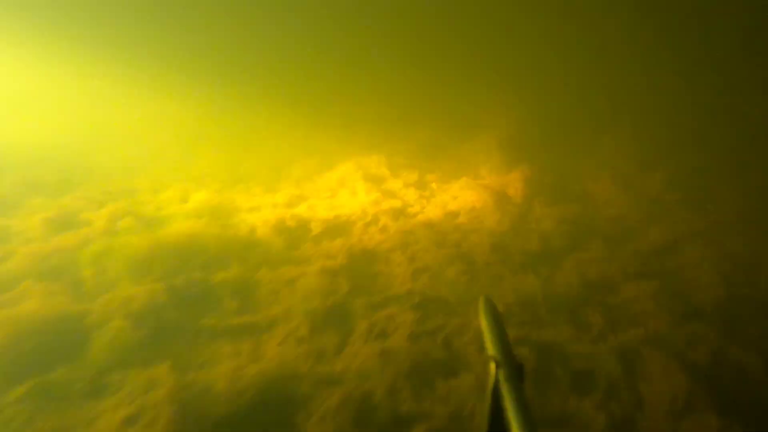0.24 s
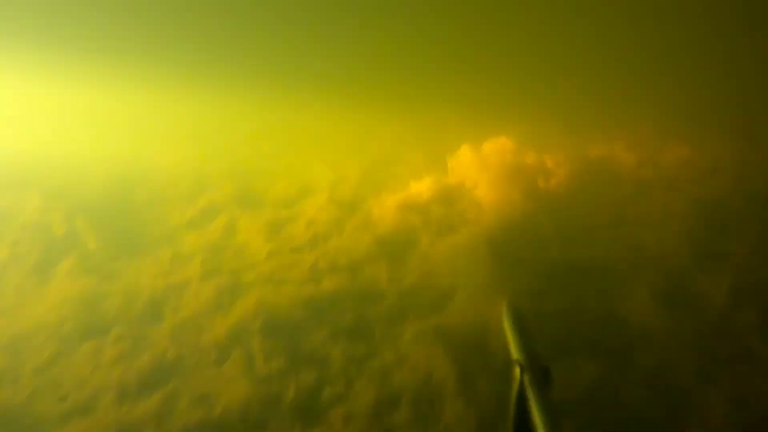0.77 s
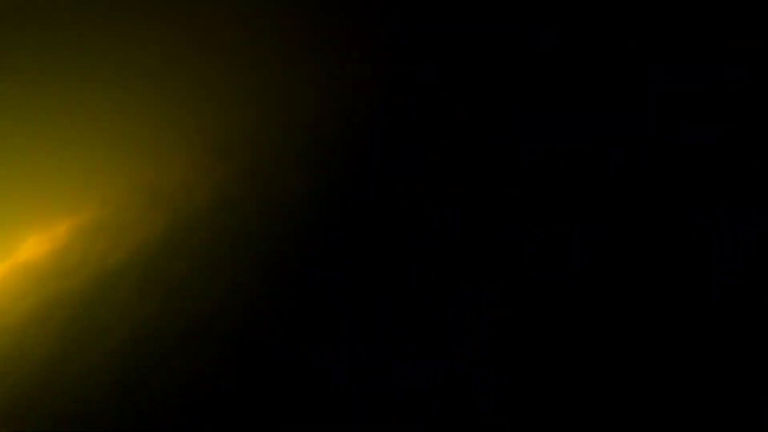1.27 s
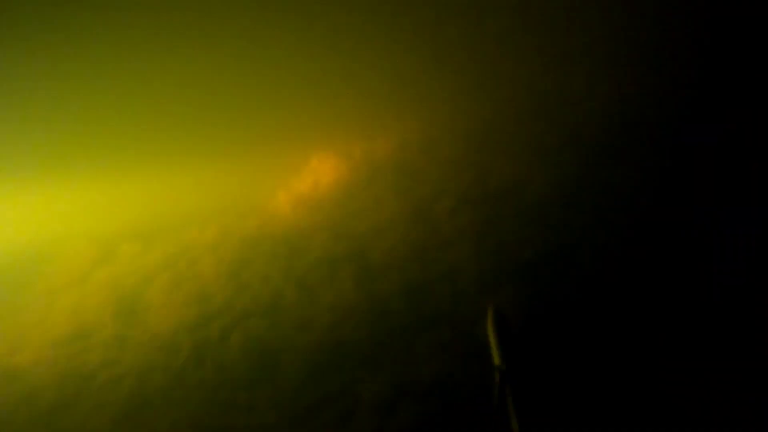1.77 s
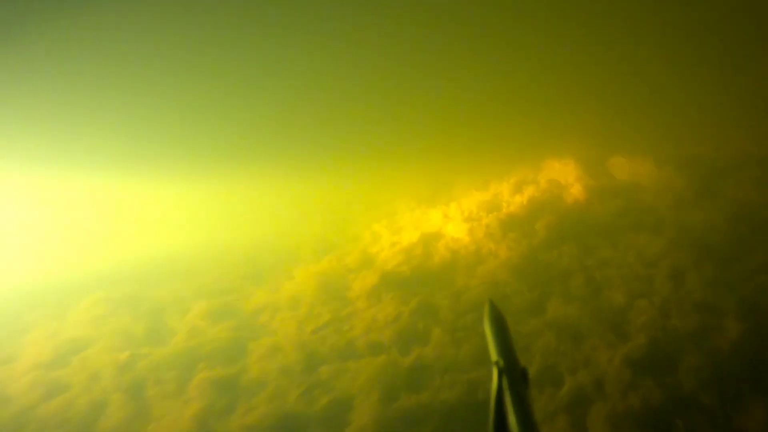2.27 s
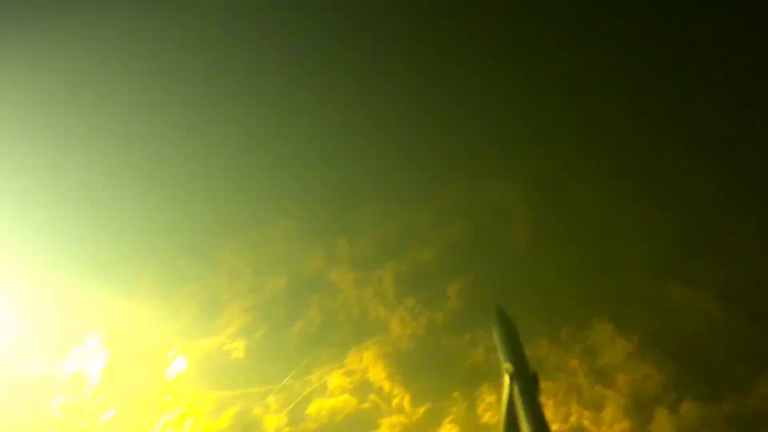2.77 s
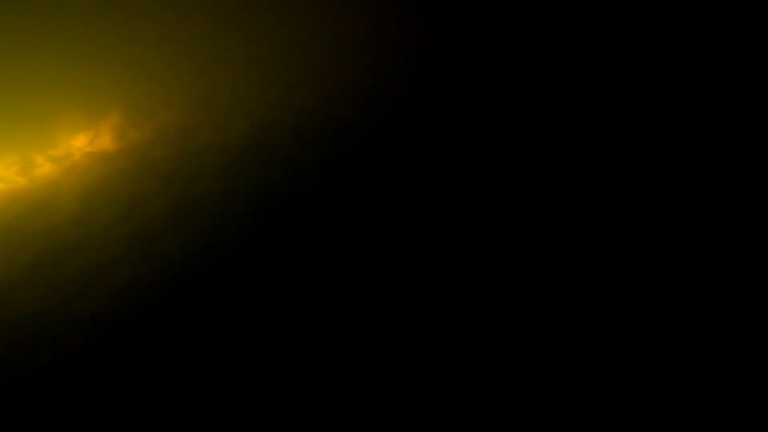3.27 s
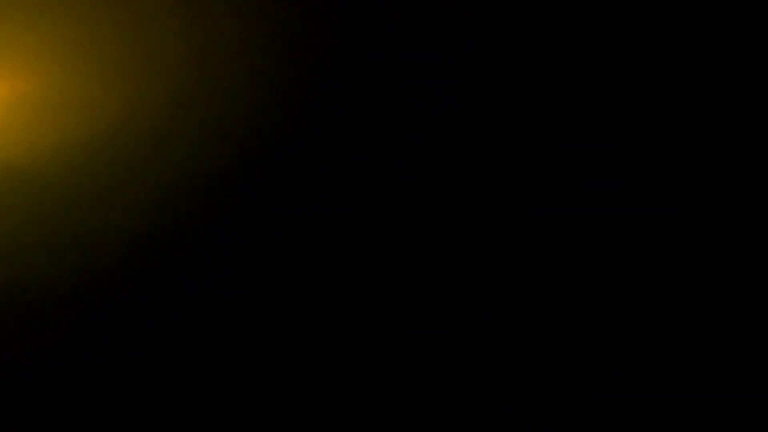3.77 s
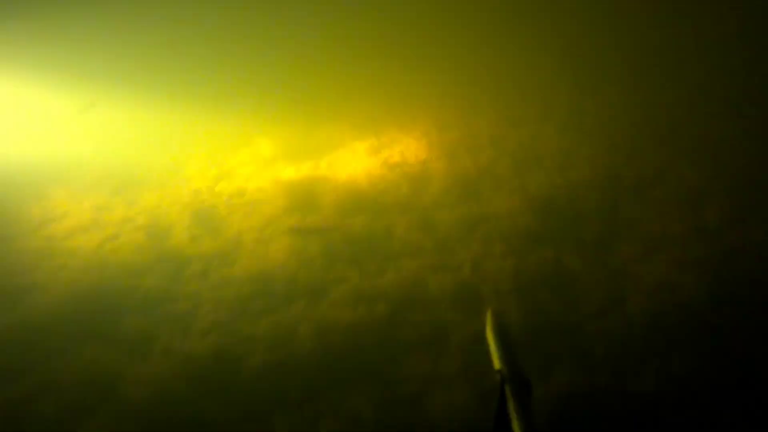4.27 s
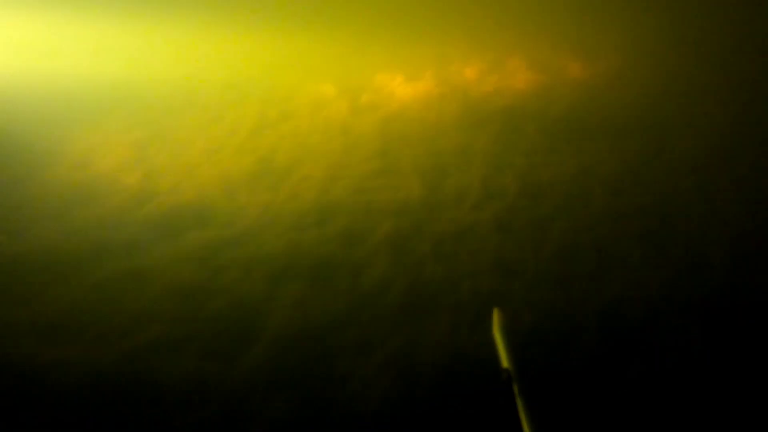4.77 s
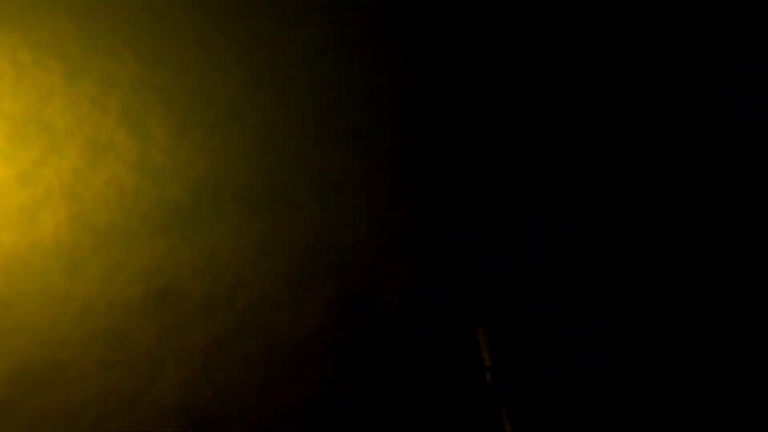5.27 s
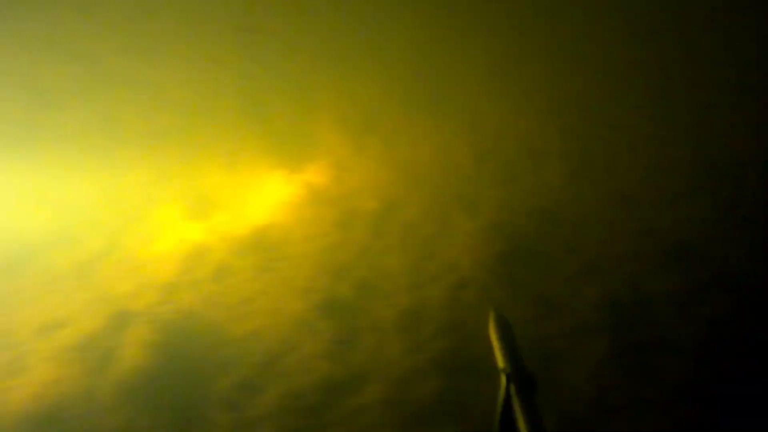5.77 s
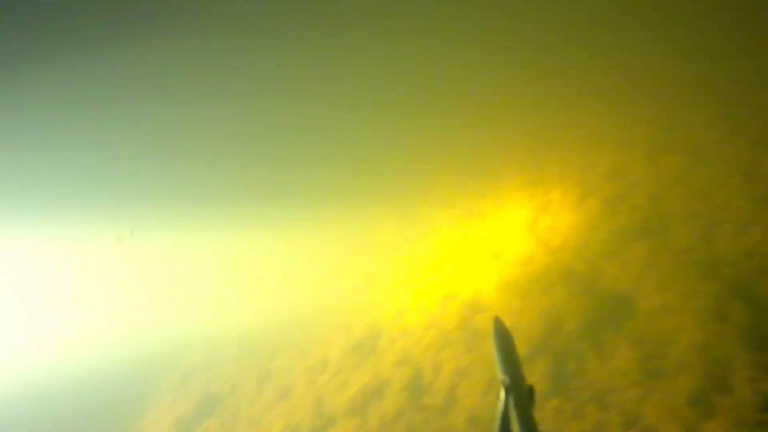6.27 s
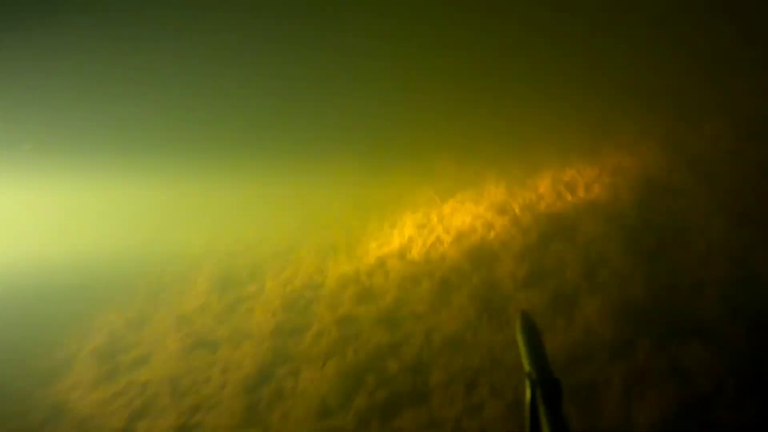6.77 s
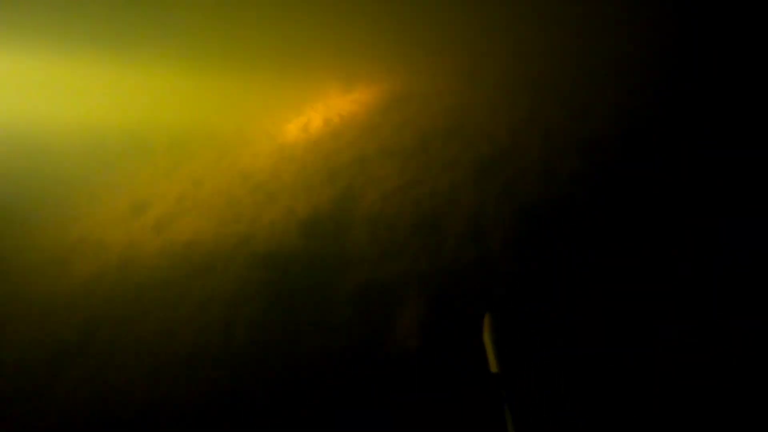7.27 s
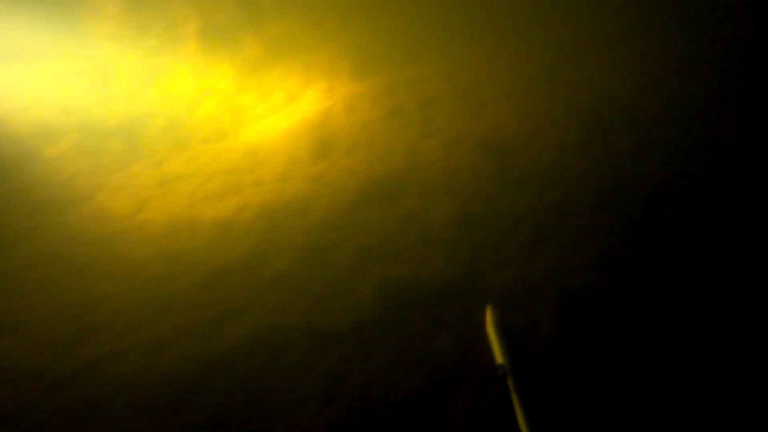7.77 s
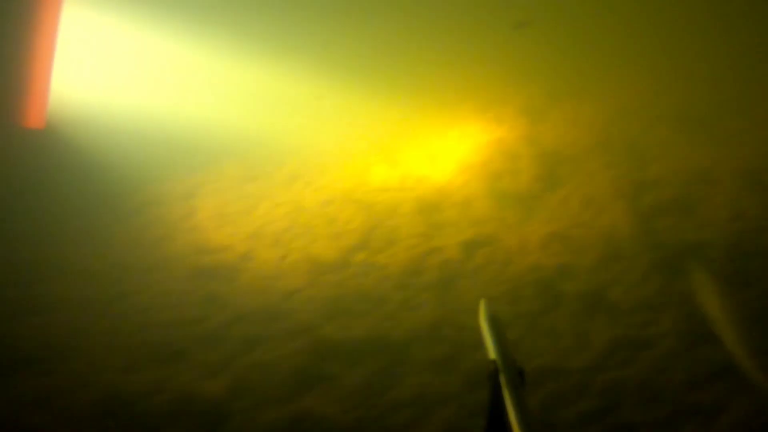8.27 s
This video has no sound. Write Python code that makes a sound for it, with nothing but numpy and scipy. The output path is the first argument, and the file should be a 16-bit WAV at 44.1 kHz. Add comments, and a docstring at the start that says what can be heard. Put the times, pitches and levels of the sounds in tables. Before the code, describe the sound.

Close, muffled underwater sound from inside a sealed camera housing near a silty riverbed. It starts quiet with a few small knocks, then churning water and hum swell after one second. Bubbles glug, bumps thud and grit scratches. Around 5.7 seconds five quick knocks judder; near 6.8 a short rasp comes amid heavy rumble. Glugs and knocks continue to the end.

```python
"""River water churns and hums around a sealed camera towed just above the bed: muffled bubble noise and
two resonances of the housing. Eddies rumble on it as low noise, and silt brushes past in bright flecks.
Bubbles glug as gliding decaying tones, small ones gurgle and fizz; bumps and grit ring housing and shell.
The housing judders once in five quick knocks and later rasps in even slips; a faint, high, fast ticking
fades in early and stops at 6.25 s."""
import sys
import numpy as np
from scipy import signal
from scipy.fft import rfft, irfft, next_fast_len
from scipy.io import wavfile
from scipy.ndimage import uniform_filter1d, minimum_filter1d

SR = 44100
rng = np.random.default_rng(int(sys.argv[2]) if len(sys.argv) > 2 else 0)


def master(y):
    """Save y as 16-bit WAV."""
    cut = np.clip(np.atleast_2d(y).T, -1, 1)
    pcm = np.round(cut * 32767)  # scale
    wavfile.write(sys.argv[1], SR, pcm.astype(np.int16))


N = 376173
TIME = np.arange(N) / SR
CRUISE_DB = -21      # flow level at cruising speed; the sounds that follow the flow refer to it
SHELL_TOP_HZ = 2700  # top of the shell's scratching in the judder and the drag


def from_db(db):
    """Level is logarithmic in amplitude: decibels to gain."""
    return 10 ** (np.asarray(db) / 20)


def rms_one(x):
    """Power is the mean square: scale to unit power."""
    return x / np.sqrt(np.mean(x ** 2) + 1e-20)


def peak_one(x):
    """Scale to unit peak amplitude."""
    return x / np.abs(x).max()


def in_time(rows):
    """Linear interpolation: the columns of a curve at every sample."""
    s, *columns = np.transpose(rows)
    return [np.interp(TIME, s, c) for c in columns]


def drift(rate_hz):
    """Low-passed noise: a smooth random fluctuation of spread 1."""
    step = 40  # samples between the points of the slow curve
    hz = np.arange(8193) * SR / step / 16384
    noise = rng.standard_normal(2 * len(hz) - 2)
    slow = rms_one(irfft(rfft(noise) / (1 + (hz / rate_hz) ** 2) ** 2))
    return np.interp(np.arange(N) / step, np.arange(len(slow)), slow)


def coloured(x, spectrum):
    """Spectral filtering: shape a steady sound by a curve over log frequency; rms 1."""
    size = next_fast_len(N)
    hz, db = np.transpose(spectrum)
    bin_hz = np.maximum(np.arange(size // 2 + 1) * SR / size, 1)
    gain = from_db(np.interp(np.log(bin_hz), np.log(hz), db))
    return rms_one(irfft(rfft(x, size) * gain, size)[:N])


def ring(clicks, modes):
    """Modal resonance: an excitation sets exponentially decaying sines ringing."""
    out = 0
    for hz, db, t60 in modes:
        radius = np.exp(-np.log(1000) / (t60 * SR))
        angle = 2 * np.pi * hz / SR
        poles = [1, -2 * radius * np.cos(angle), radius * radius]
        out = out + from_db(db) * signal.lfilter([0, np.sin(angle)], poles, clicks + 1e-18)
    return out


def grains(per_s, spread_db):
    """Shot noise: impacts at random moments, their levels spread exponentially in dB; rms 1."""
    level_db = spread_db * np.minimum(rng.exponential(1, N), 4)
    sizes = from_db(level_db) * rng.choice([-1, 1], N)
    return rms_one(sizes * (rng.random(N) < per_s / SR))


def around(s):
    """Sample indices near a moment, and their times from it in s."""
    near = np.arange(max(int((s - .06) * SR), 0), min(int((s + .25) * SR), N))
    return near, near / SR - s


def swell_and_die(t, swell, t60):
    """Damped response: a rounded rise to 1 at t = 0, then an exponential decay."""
    soft = np.hypot(t, swell) - swell
    return np.where(t < 0, np.exp(-(t / swell) ** 2), np.exp(-np.log(1000) * soft / t60))


def passing(rows):
    """Drifting sources: gain that swells and fades as a Gaussian around each moment."""
    return sum(from_db(db) * np.exp(-((TIME - s) / length) ** 2) for s, db, length in rows)


def churn(level_db, brightness):
    """Bubble noise, muffled by the housing: each band fluctuates in clouds of its own, so the hum gurgles."""
    # spectrum of the churning: hz, relative_db
    churn_spectrum = [(20, -58.5), (90, -32), (170, -9.5), (250, -1.5), (340, 3.5), (385, 1.5), (450, 2),
                      (510, -2), (590, -17.5), (720, -20), (880, -25.5), (1200, -31.5), (1390, -52),
                      (7000, -110)]
    water = coloured(grains(per_s=500, spread_db=-0.5) + .5 * rng.standard_normal(N), churn_spectrum)
    size = next_fast_len(N)
    bins = rfft(water, size)
    octaves = np.log2(np.maximum(np.linspace(0, SR / 2, len(bins)), 1) / 400)  # from 400 Hz
    together_db = drift(rate_hz=7.6)
    out = 0
    for centre in np.arange(-3, 5) / 2:
        # overlapping triangular bands, half an octave apart
        share = np.maximum(1 - 2 * np.abs(np.clip(octaves, -1.5, 2) - centre), 0)
        cloud_db = brightness * centre + together_db + 1.62 * drift(rate_hz=18.0)
        out = out + from_db(cloud_db) * irfft(bins * share, size)[:N]
    return from_db(level_db + 1.18) * out


def hum(flow_db):
    """Flow-excited resonance: broadband noise keeps two modes of the housing softly ringing."""
    # resonances that the flow draws from the housing: hz, relative_db, t60_s
    hum_modes = [(214.6, -12.5, 0.53), (464.5, 16.5, 0.13)]
    band = signal.butter(4, [170, 560], "band", fs=SR, output="sos")
    tone = signal.sosfilt(band, ring(rng.standard_normal(N), hum_modes))
    cruise_hum_db, follows = -30, 1  # level at cruising speed; share of the flow's swing
    return from_db(cruise_hum_db + follows * (flow_db - CRUISE_DB)) * rms_one(tone)


def rumble(turbulence_db):
    """Turbulent pressure: large eddies sway the housing, smaller ones buffet it in lumps; single ones pass."""
    # spectrum of the swaying: hz, relative_db
    sway_spectrum = [(4, -16), (12, 6.5), (22, 19), (35, 18.5), (52, 12), (75, -13.5), (200, -56.5),
                     (800, -120)]
    # spectrum of the buffeting: hz, relative_db
    buffet_spectrum = [(10, -30.5), (36, -20), (60, 2.5), (85, -0.5), (130, -6), (170, -1.5), (200, -8.5),
                       (260, -10), (600, -65.5), (3000, -120)]
    # single eddies that buffet the housing: centre_s, level_db, passing_s
    single_eddies = [(0.2, -28, 0.079), (1.11, -28, 0.031), (1.499, -23.5, 0.048), (2.41, -24, 0.06),
                     (2.755, -22.5, 0.14), (4.08, -13, 0.014), (4.66, -16.5, 0.075), (5.13, -20, 0.038),
                     (5.331, -24, 0.062), (5.519, -14.5, 0.025), (6.021, -14.5, 0.066),
                     (6.91, -13.5, 0.052), (7.51, -19, 0.039), (8.14, -14, 0.015)]
    usual_turbulence_db = -26
    sway_db, sway_follows = -25.5, 0.81  # level at usual turbulence; share of its swing
    buffet_db, lumps_db = -4, 2  # level relative to the turbulence; spread of the lumps
    lumps = from_db(turbulence_db + buffet_db + lumps_db * drift(rate_hz=23))
    sway_gain = from_db(sway_db + sway_follows * (turbulence_db - usual_turbulence_db))
    sway = sway_gain * coloured(rng.standard_normal(N), sway_spectrum)
    buffet = coloured(rng.standard_normal(N), buffet_spectrum)
    return sway + np.hypot(lumps, passing(single_eddies)) * buffet


def silt_level(flow_db):
    """Addition of powers: a thin haze follows the flow, and each cloud adds to it, holds and thins; in dB."""
    # clouds of silt that the camera passes through: start_s, length_s, level_db
    silt_clouds = [(2.555, 0.028, -56.5), (2.726, 0.066, -55), (3.162, 0.088, -57.5), (3.341, 0.28, -55.5),
                   (3.437, 0.067, -50.5), (4.14, 0.11, -61), (5.428, 0.15, -52), (5.61, 0.21, -61),
                   (6.218, 0.44, -62.5), (6.288, 0.22, -55.5), (6.702, 0.23, -60), (7.35, 0.054, -61),
                   (7.559, 0.087, -60.5), (8.079, 0.079, -59)]
    attack_s, release_s = 0.016, 0.019
    haze_db, follows = -61.5, 0.74  # level at cruising speed; share of the flow's swing
    power = from_db(haze_db + follows * (flow_db - CRUISE_DB)) ** 2
    for start, length, db in silt_clouds:
        before = np.maximum(start - TIME, 0) / attack_s
        after = np.maximum(TIME - start - length, 0) / release_s
        power = power + (from_db(db) * np.exp(-before - after)) ** 2
    return 10 * np.log10(power) + 0.5 * drift(rate_hz=26)


def silt(level_db):
    """Granular friction: fine sediment brushes the shell in flecks; the thicker it comes, the brighter."""
    # spectrum of thin silt: hz, relative_db
    thin_spectrum = [(700, -26), (1400, -7), (1750, 5), (2050, -4.5), (2450, -2.5), (3100, -22.5),
                     (3750, -16), (4500, -20), (5300, -30), (7000, -41.5), (8500, -54.5), (15000, -60.5)]
    # spectrum of thick silt: hz, relative_db
    thick_spectrum = [(1500, -16), (2600, 4), (3100, -2.5), (3750, -4), (4500, -7.5), (5300, -13),
                      (7000, -14), (8500, -31), (15000, -37)]
    flecks_db = level_db + 2.2 * drift(rate_hz=30)
    # separate impacts over a softer steady noise make the brush, and likewise the spray
    brush = coloured(grains(per_s=300, spread_db=2.6) + .7 * rng.standard_normal(N), thin_spectrum)
    spray = coloured(grains(per_s=700, spread_db=2.2) + .4 * rng.standard_normal(N), thick_spectrum)
    spray_db = np.minimum(-6.0 + 0.26 * (level_db + 55.0), -4.5)
    return from_db(flecks_db - 1.4) * (brush + from_db(spray_db) * spray)


def small_bubbles(flow_db):
    """Bubble resonance: small bubbles gurgle in swarms just above the hum, each at its own pitch."""
    # dense swarms of small bubbles: centre_s, level_db, passing_s
    dense_swarms = [(1.55, -50, .14), (2.57, -30.5, 0.021), (3.22, -36.5, 0.08), (3.92, -33.5, 0.09),
                    (6.82, -32, .08), (7.24, -40, 0.074), (7.61, -30.5, .06), (8.1, -31.5, 0.048),
                    (8.5, -43, 0.05)]
    pitches = np.geomspace(560, 1700, num=24)  # Hz
    births = grains(per_s=150, spread_db=3) * from_db(2 * drift(rate_hz=12))
    dealt = rng.integers(0, len(pitches), N)
    blips = 0
    for k, hz in enumerate(pitches):
        mode = (hz, -11 * np.log2(hz / pitches[0]), 32 / hz)
        blips = blips + ring(births * (dealt == k), [mode])
    muffle = signal.butter(6, 1400, fs=SR, output="sos")
    cruise_bubbles_db, follows = -40, 0.65  # level at cruising speed; share of the flow's swing
    steady = from_db(cruise_bubbles_db + follows * (flow_db - CRUISE_DB))
    return np.hypot(steady, passing(dense_swarms)) * rms_one(signal.sosfilt(muffle, blips))


def fizz(flow_db):
    """Bubble resonance: tiny bubbles patter softly as short high pings, a little more in a strong flow."""
    pitches = np.geomspace(1300, 2700, num=16)  # Hz
    births = grains(per_s=60, spread_db=3)
    dealt = rng.integers(0, len(pitches), N)
    pings = 0
    for k, hz in enumerate(pitches):
        mode = (hz, -8 * np.log2(hz / pitches[0]), 34 / hz)
        pings = pings + ring(births * (dealt == k), [mode])
    band = signal.butter(2, [1000, 2500], "band", fs=SR, output="sos")
    cruise_fizz_db, follows = -68, 0.79  # level at cruising speed; share of the flow's swing
    return from_db(cruise_fizz_db + follows * (flow_db - CRUISE_DB)) * rms_one(signal.sosfilt(band, pings))


def contact(t, length, rough):
    """Contact excitation: one hard click, and a grainy scuff that rises quickly and dies away."""
    rise_s = .0012
    grain = rng.standard_normal(len(t)) * rng.exponential(1, len(t))
    scuff = np.where(t < 0, np.exp(-(t / rise_s) ** 2), np.exp(-np.abs(t) / length)) * grain
    click = np.arange(len(t)) == np.argmin(np.abs(t))
    return click + rough * scuff / np.linalg.norm(scuff)


def scratch(t, length, hz, top_hz):
    """Modal excitation of the shell: a click and scrape ring it, duller for a lower top_hz; unit peak."""
    # resonances of the shell: hz, relative_db, t60_s
    shell_modes = [(1250, 2.5, 0.0078), (1700, 7, 0.0081), (2400, -8, 0.004), (3640, -6, 0.0072),
                   (4250, -4.5, 0.002), (6740, -8.5, .003)]
    muffle = signal.butter(5, min(top_hz, SR / 3), fs=SR, output="sos")
    grain_mode = (hz, 4, .006)  # coarser grains sound lower
    scrape = ring(contact(t, length, rough=2.5), shell_modes + [grain_mode])
    return peak_one(signal.sosfilt(muffle, np.diff(scrape, prepend=0)))


def grit():
    """Impact and friction: each coarse grain strikes the shell and scrapes along it briefly."""
    # coarse grit scraping the shell: strike_s, peak_db, ring_hz, top_hz, scrape_s
    grit_grains = [(0.022, -41, 2000, 2500, .008), (0.04, -54, 4220, 4300, .004),
                   (0.078, -54, 1900, 2700, .006), (0.115, -54.5, 2600, 2800, .005),
                   (0.226, -42, 2000, 2300, 0.011), (0.38, -49, 1700, 2400, 0.0072),
                   (0.676, -54, 4200, 6500, .003), (1.036, -47, 1900, 3000, .005),
                   (1.316, -46, 4200, 5960, .004), (1.666, -39, 1910, 2800, .0031),
                   (1.901, -45, 2200, 3600, .004), (2.525, -42, 1780, 1900, .005),
                   (2.559, -44, 3500, 3770, .012), (2.577, -39, 3600, 3900, .008),
                   (2.615, -45, 3850, 4100, .02), (2.655, -33, 3850, 4270, .007),
                   (2.735, -32, 1950, 2270, .005), (2.761, -39, 1900, 3720, .003),
                   (2.934, -42.5, 3560, 4950, .0036), (3.247, -39.5, 2000, 3000, .004),
                   (3.339, -36, 2000, 3030, .0055), (3.607, -35, 3900, 6000, .002),
                   (3.903, -32, 1610, 2300, .006), (3.95, -36.5, 1800, 3180, .003),
                   (4.004, -43.5, 3350, 3870, .004), (4.257, -37.5, 2800, 4850, .005),
                   (4.534, -35, 2010, 2900, .005), (4.991, -32.5, 2200, 4500, .0044),
                   (5.031, -32, 2000, 4280, .0034), (5.277, -38, 2200, 3200, .005),
                   (5.499, -27, 1720, 2700, .0054), (5.634, -33, 2500, 3000, .003),
                   (5.75, -42, 2700, 4430, .003), (5.801, -43, 3500, 7200, .001),
                   (5.892, -40, 2180, 2540, .0034), (6.053, -42.5, 2670, 4200, .0043),
                   (6.655, -40, 2400, 3840, .004), (6.732, -28, 1500, 2120, .008),
                   (6.923, -30.5, 1900, 2000, .005), (7.114, -41, 1800, 2600, .0043),
                   (7.422, -37, 1860, 2930, .005), (7.463, -58, 1910, 3030, .004),
                   (7.644, -41, 2000, 3620, 0.006), (7.823, -30, 2000, 2400, .0048),
                   (7.873, -35.5, 1540, 1790, .009), (8.134, -31, 1900, 2970, 0.0057),
                   (8.317, -44.5, 1900, 3680, .005)]
    out = np.zeros(N)
    for s, db, hz, top_hz, length in grit_grains:
        near, t = around(s)
        out[near] += from_db(db) * scratch(t, length, hz, top_hz)
    return out


def knock(t, length, top_hz):
    """Modal excitation of the water-damped housing: a contact rings it, dull if soft; unit peak."""
    # resonances of the housing: hz, relative_db, t60_s
    housing_modes = [(470, 16.5, 0.014), (600, 8.5, 0.013), (900, 1, 0.02), (1170, -8.5, 0.02),
                     (1450, -17, 0.0023), (1880, -14, 0.0089)]
    dull = signal.butter(7, min(top_hz, SR / 3), fs=SR, output="sos")
    return peak_one(signal.sosfilt(dull, ring(contact(t, length, rough=1.5), housing_modes)))


def bumps():
    """Impact response: each bump is a knock, followed by a short boom of the whole housing."""
    # bumps against the housing: contact_s, contact_db, contact_top_hz, boom_db, boom_hz
    bump_contacts = [(0.023, -23, 2000, -16.5, 193), (0.155, -18, 1250, -22, 343),
                     (0.174, -23, 1120, -24, 370), (0.187, -24, 1200, -29, 362),
                     (0.277, -39, 690, -30, 243), (2.633, -12, 600, -28, 340),
                     (2.732, -12.5, 1900, -4.5, 433), (3.18, -9.5, 1250, -23, 780),
                     (4.299, -13.5, 750, -11, 452), (4.532, -4, 900, -1, 483), (4.624, -10, 1124, -10, 399),
                     (5.435, -11, 2600, -5.5, 413), (5.568, -13.5, 900, -9, 470),
                     (5.633, -8.5, 1540, -41, 390), (6.654, -8, 1140, -5, 443),
                     (6.731, -7.5, 1450, -8.5, 353), (6.922, -7, 980, -1, 470), (6.978, -15, 800, -14, 470),
                     (7.167, -9.5, 850, -9, 349), (8.154, -10, 760, -7, 442), (8.206, -12, 1200, -3, 456),
                     (8.316, -11.5, 715, -14, 467), (8.461, -15, 900, -9.5, 423)]
    delay_s, swell_s, t60_s = 0.0043, 0.0037, 0.04  # of the boom
    out = np.zeros(N)
    for s, contact_db, top_hz, boom_db, boom_hz in bump_contacts:
        near, t = around(s)
        boom = swell_and_die(t - delay_s, swell_s, t60_s) * np.sin(2 * np.pi * boom_hz * t)
        out[near] += from_db(contact_db) * knock(t, .0065, top_hz) + from_db(boom_db) * boom
    return out


def glugs():
    """Bubble resonance: each large bubble swells in about two cycles, rings, and glides as it changes shape."""
    # large bubbles: peak_s, peak_db, pitch_hz, t60_s, glide_octaves_per_s
    large_bubbles = [(0.487, -32.5, 765, 0.11, 3), (0.818, -23, 609, 0.038, -1),
                     (1.045, -35.5, 705, 0.068, 0.5), (1.43, -18.5, 541.4, .094, -3),
                     (1.567, -28, 780, 0.078, -0.5), (1.599, -16, 463.5, .08, 1),
                     (2.01, -9.5, 320, .031, 1.5), (2.058, -11.5, 275.5, 0.073, -1.5),
                     (2.19, -4, 272.6, 0.064, -5.5), (2.275, -19, 610, 0.052, -2),
                     (2.974, -22, 1074, 0.068, 2), (3.185, -20.5, 740, 0.039, 0.5),
                     (3.203, -5.5, 312.8, 0.053, -1.5), (3.25, -8, 459, 0.18, 0.5),
                     (3.637, -9, 438, 0.13, 4), (3.668, -14, 518.5, .13, 5.5),
                     (3.869, -6.5, 450.4, 0.063, 1.5), (4.166, -7.5, 357.6, 0.023, -1.5),
                     (4.35, -22.5, 680, 0.14, -3.5), (4.412, -12.5, 245, 0.076, -0.5),
                     (4.415, -28, 790, 0.056, -1.5), (4.624, -5, 210.4, 0.28, -1),
                     (4.636, -2, 342, 0.097, 1), (4.70, -6.5, 330.7, 0.067, 0), (4.704, -5.5, 217, 0.13, 2),
                     (4.858, -25, 651, 0.028, -1.5), (5.022, -16.5, 671, 0.12, -0.9),
                     (5.257, -9.5, 350.6, 0.1, 0), (6.492, -7.5, 468.4, 0.044, -0.5),
                     (6.909, -5.5, 281.7, 0.094, 2), (7.409, -2, 415.4, 0.054, 1.5),
                     (7.422, -2, 442.4, 0.05, 4.5), (7.703, -10, 448.3, .09, 3.5),
                     (7.763, -4, 448.7, 0.19, 0), (7.812, -7.5, 349, 0.1, -2.5),
                     (7.978, -52, 2560, 0.035, -0.5), (8.204, -29.5, 1100, 0.045, 1),
                     (8.32, -1.5, 470, 0.058, -6), (8.485, -9.5, 382.6, 0.058, -1)]
    out = np.zeros(N)
    for s, db, hz, t60, glide in large_bubbles:
        near, t = around(s)
        phase = 2 * np.pi * (np.cumsum(hz * 2 ** (glide * t)) / SR + rng.random())
        out[near] += from_db(db) * swell_and_die(t, 2.1 / hz, t60) * np.sin(phase)
    return out


def ticking():
    """Periodic excitation of high resonances over a thin hiss: it fades in, wavers, slows a little, stops."""
    # pace of the ticking: time_s, ticks_per_s
    tick_pace = [(0, 37.6), (3, 36.1), (6.3, 35.1)]
    # level of the ticking: time_s, level_db
    tick_level = [(0.55, -100), (0.68, -87), (1.25, -76), (2.4, -75), (3.45, -66.5), (3.7, -74), (4.3, -67),
                  (4.8, -78), (5.2, -69.5), (5.66, -69), (5.72, -73), (6.24, -71)]
    # resonances of the ticking: hz, relative_db, t60_s
    tick_modes = [(5600, -4, 0.0065), (5940, 1, 0.007), (6390, 1, .009), (6700, -4.5, 0.0059),
                  (7460, -3, 0.0084)]
    stop_s = 6.25
    per_s, level_db = in_time(tick_pace) + in_time(tick_level)
    beats = np.diff(np.floor(np.cumsum(per_s) / SR), prepend=0)
    fade = np.exp(-1 / (.0014 * SR))
    # a double pole rounds each beat into a pulse
    strength = peak_one(signal.lfilter([1], [1, -2 * fade, fade ** 2], beats + 1e-18))
    hiss = 1 / 6
    bursts = (strength * from_db(1.2 * drift(rate_hz=20)) + hiss) * rng.standard_normal(N)
    band = signal.butter(2, [5000, 7400], "band", fs=SR, output="sos")
    ticks = rms_one(signal.sosfilt(band, ring(bursts, tick_modes)))
    return (TIME < stop_s) * from_db(level_db) * ticks


def shoves():
    """Pressure pulse: a big passing eddy gives the housing one suck and one push."""
    # big eddies that shove the housing: centre_s, envelope_db, pitch_hz
    big_eddies = [(2.423, -6, 32), (3.548, -2, 46), (4.601, -1.5, 72), (6.833, -3, 58), (6.985, -1.5, 60.5),
                  (7.612, -7.5, 57)]
    out = np.zeros(N)
    for s, db, hz in big_eddies:
        near, t = around(s)
        out[near] += from_db(db) * np.exp(-(t * hz / 0.46) ** 2) * np.sin(2 * np.pi * hz * t)
    return out


def judder():
    """Contact stiffening: pitch shoots up and sinks into a thud; the shell cracks, rubbing rasps and squeaks."""
    # the judder: knock_s, relative_knock_db, squeak_db, squeak_delay_s, squeak_decay_s, squeak_hz
    judder_knocks = [(5.675, -5, -20, 0.00072, 0.009, 1470), (5.7208, -4.5, -17.5, -0.0042, 0.0055, 1490),
                     (5.7572, -6, -22.5, 0.0036, 0.0054, 1430), (5.7952, -6, -12.5, 0.002, 0.0025, 1420),
                     (5.844, -7, -19, 0.0029, 0.0051, 1510)]
    thud_db, rub_db, crack_db = 7.0, -8, -28  # relative to the knock
    rub_s, rub_top_hz, crack_hz = 0.0046, 1780, 1900
    out = np.zeros(N)
    for s, db, squeak_db, delay, length, squeak_hz in judder_knocks:
        near, t = around(s)
        hz = 215 + 190 * np.exp(-np.abs(t) / 0.00501) + 750 * np.exp(-(t / 0.00044) ** 2)
        force = np.exp(-np.hypot(t - .003, .002) / .0065) * (1 - .55 * np.exp(-(t / .001) ** 2))
        thud = force * np.sin(2 * np.pi * np.cumsum(hz) / SR)
        # the squeak wavers in pitch and is rough in level
        wobble, grip = rms_one(uniform_filter1d(rng.standard_normal((2, len(t))), size=70))
        waver = 1 + .036 * wobble
        roughness = 1 + .2 * uniform_filter1d(grip, size=40)
        pressure = np.exp(-np.hypot(t - delay, .002) / length) * roughness
        squeak = pressure * np.sin(2 * np.pi * np.cumsum(squeak_hz * waver) / SR)
        rub = knock(t, rub_s, rub_top_hz)
        crack = scratch(t, rub_s, crack_hz, SHELL_TOP_HZ)
        blow = from_db(thud_db) * thud + from_db(rub_db) * rub + from_db(crack_db) * crack
        out[near] += from_db(db) * blow + from_db(squeak_db) * squeak
    return out


def drag():
    """Stick-slip friction: a short rasp of even slips, each knocking the housing and scratching its shell."""
    # level of the slips as the housing drags: time_s, level_db
    slip_level = [(6.75, -22), (6.765, -18), (6.8, -18.5), (6.85, -18), (6.87, -15.5), (6.905, -22)]
    start_s, every_s, contact_s = 6.749, .017, .009
    top_hz, shell_hz, shell_db = 1750, 1350, -20  # shell level relative to the knock
    out = np.zeros(N)
    for s in np.arange(start_s, slip_level[-1][0], every_s):
        near, t = around(s)
        shell = from_db(shell_db) * scratch(t, contact_s, shell_hz, SHELL_TOP_HZ)
        slip = knock(t, contact_s, top_hz) + shell
        out[near] += from_db(np.interp(s, *np.transpose(slip_level))) * slip
    return out


def scene():
    """Superposition: everything reaches the one microphone through the housing."""
    # the flow, heard as churning; silt and bubbles follow it: time_s, level_db, brightness_db_per_octave
    flow_curve = [(0.0, -30, -22.5), (0.06, -37.5, -7), (0.14, -39.5, -3), (0.22, -34, -9),
                  (0.32, -38.5, -2.5), (0.64, -37, 4.5), (1.52, -24, 2), (2.06, -22, 0), (2.58, -23.5, 0.5),
                  (2.76, -19, 0), (2.92, -19.5, 2.5), (3.23, -18, -1), (4.01, -21, 2), (4.92, -22, -3),
                  (5.51, -22.5, 3), (5.64, -15, -2.5), (5.73, -24.5, -6), (5.86, -27, 2), (6.1, -23.5, -1),
                  (6.79, -17.5, 1), (7.15, -23.5, 1.5), (7.46, -22.5, 5), (7.92, -22.5, 2.5),
                  (8.12, -21, 1), (8.53, -22.5, 6)]
    # strength of the turbulence on the housing: time_s, level_db
    turbulence_curve = [(0.0, -33), (0.52, -35), (0.78, -37.5), (1.33, -27), (1.85, -34.5), (2.87, -22),
                        (3.44, -21), (3.82, -28), (4.08, -25.5), (4.28, -18), (4.51, -20.5), (4.77, -22.5),
                        (6.41, -25.5), (6.94, -10), (7.27, -22), (7.67, -13.5), (7.89, -25.5),
                        (8.53, -27.5)]
    flow_db, brightness = in_time(flow_curve)
    turbulence_db, = in_time(turbulence_curve)
    water = churn(flow_db, brightness) + hum(flow_db) + rumble(turbulence_db) + shoves()
    sediment = silt(silt_level(flow_db))
    bubbles = glugs() + small_bubbles(flow_db) + fizz(flow_db)
    contacts = grit() + bumps() + judder() + drag()
    return (water + sediment + bubbles + contacts + ticking())[None]


def record(dry):
    """Peak limiting and low-pass filtering: a smooth gain holds peaks to full scale, then the top is cut."""
    room = minimum_filter1d(1 / np.maximum(np.abs(dry), 1), size=441)
    gain = uniform_filter1d(uniform_filter1d(room, size=220), size=220)
    top_cut = signal.cheby2(12, 70, 15500, fs=SR, output="sos")  # 70 dB down from 15500 Hz
    return signal.sosfilt(top_cut, dry * gain)


dry = scene()
out = record(dry)
master(out)
```